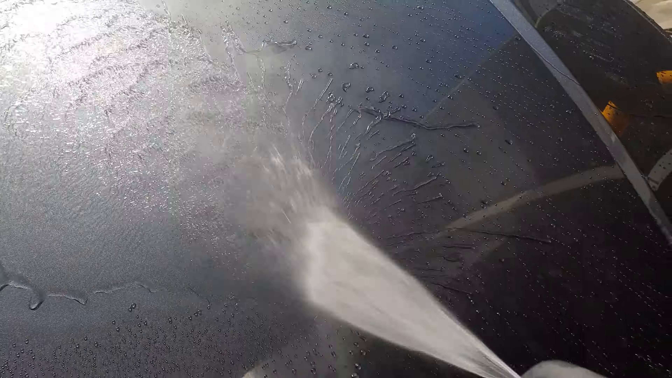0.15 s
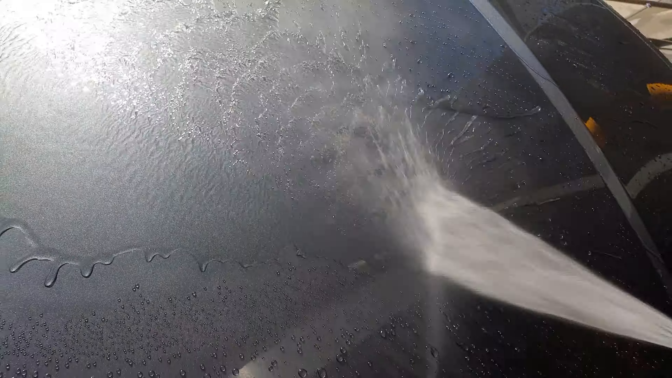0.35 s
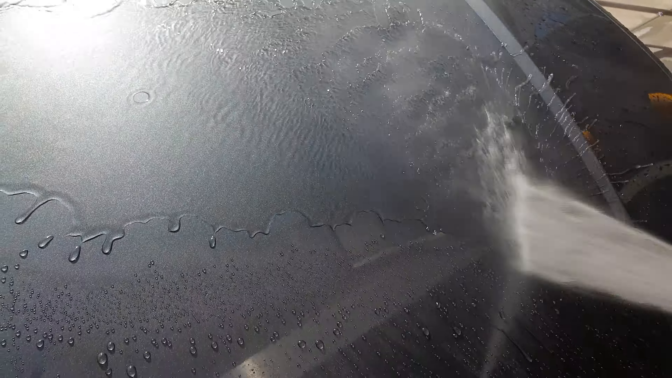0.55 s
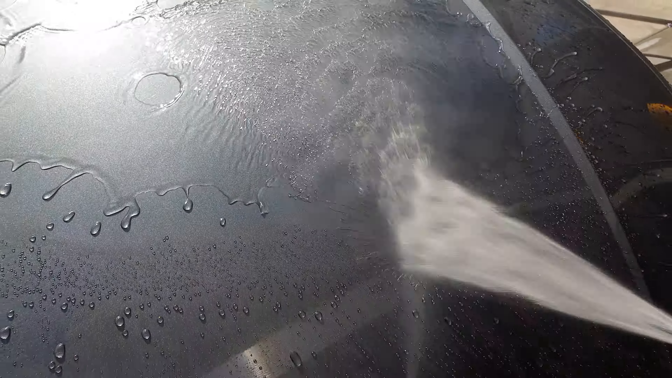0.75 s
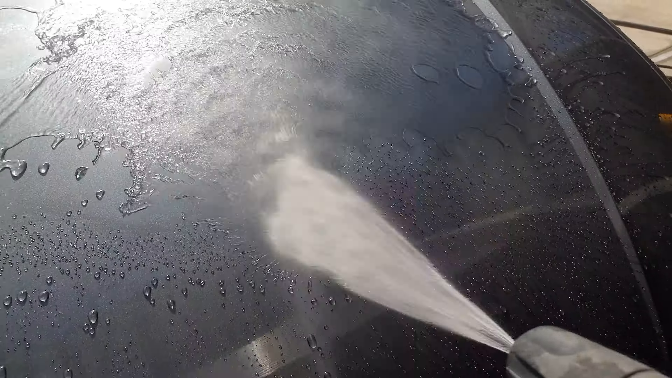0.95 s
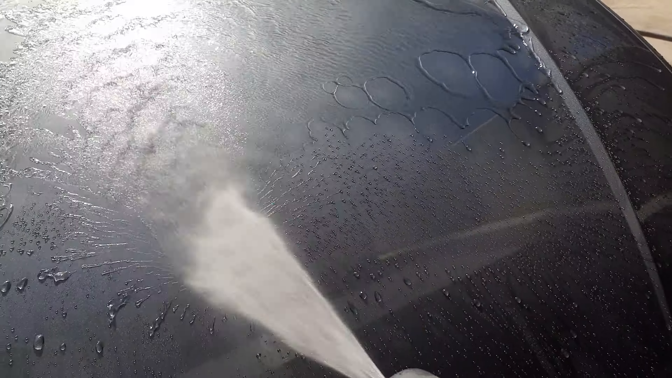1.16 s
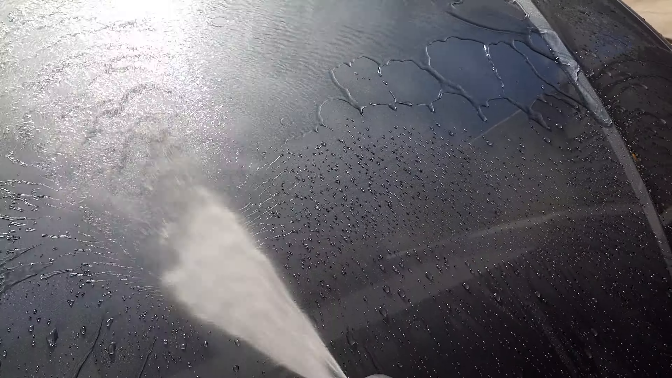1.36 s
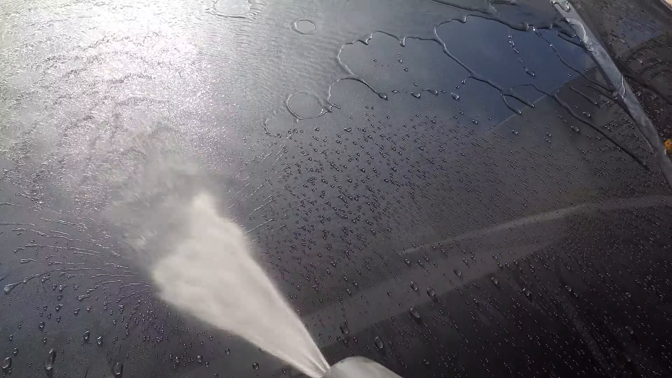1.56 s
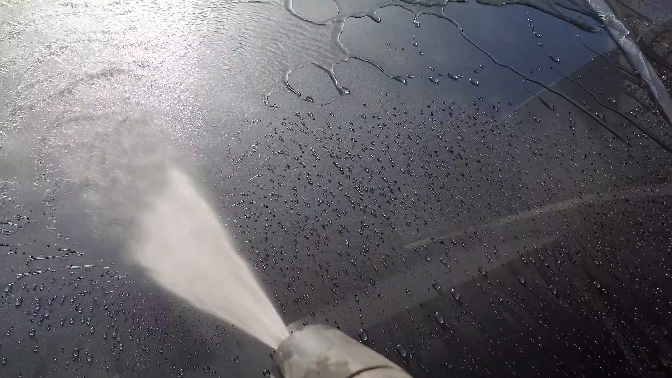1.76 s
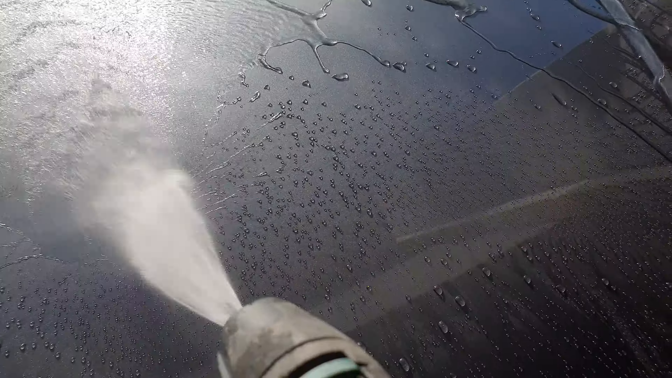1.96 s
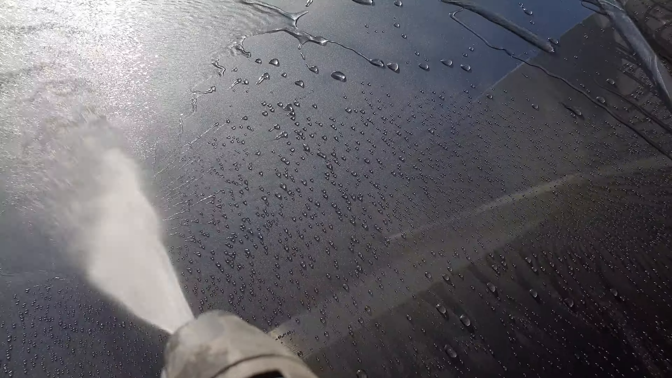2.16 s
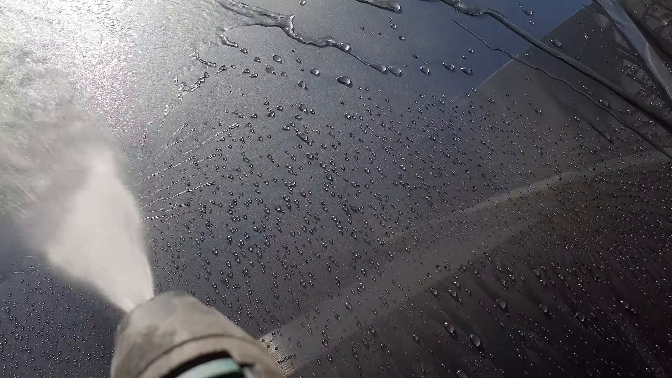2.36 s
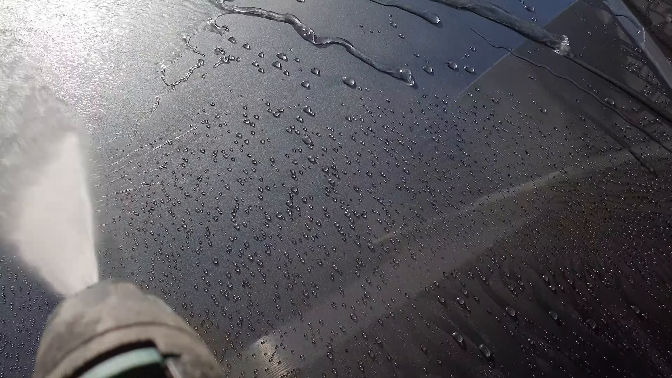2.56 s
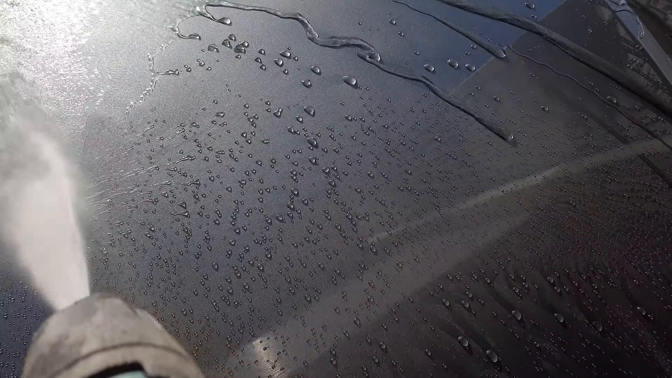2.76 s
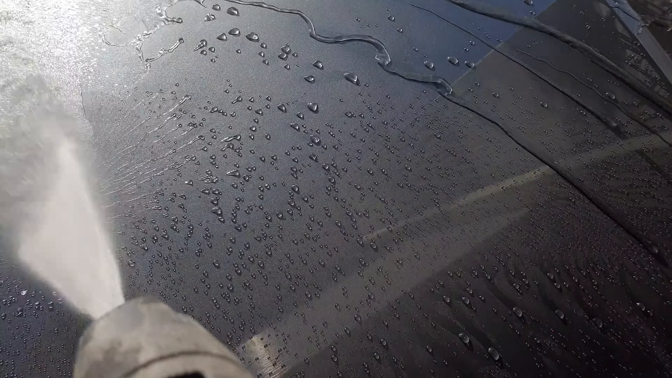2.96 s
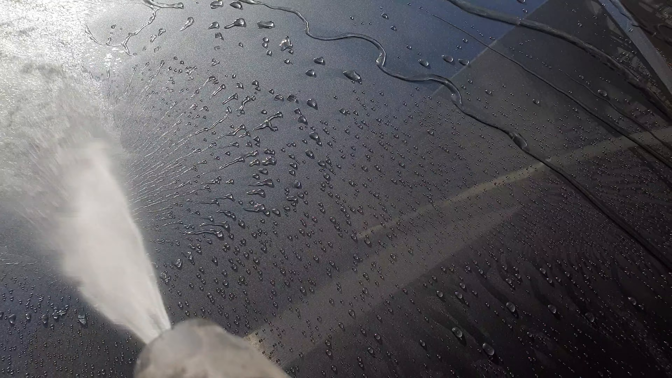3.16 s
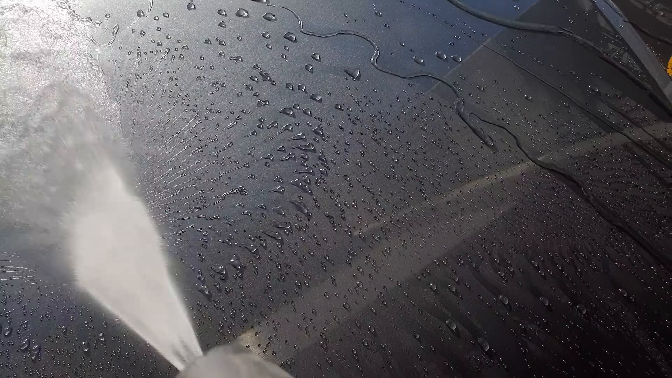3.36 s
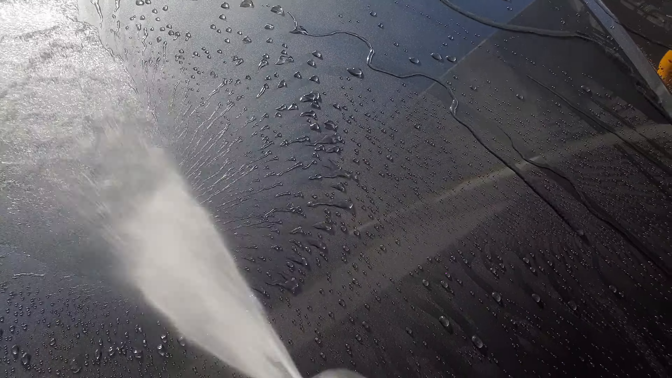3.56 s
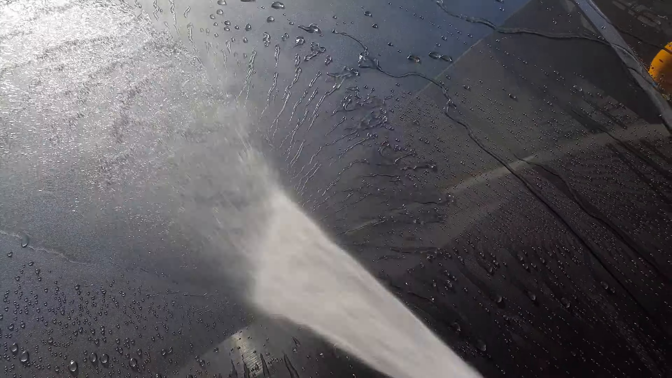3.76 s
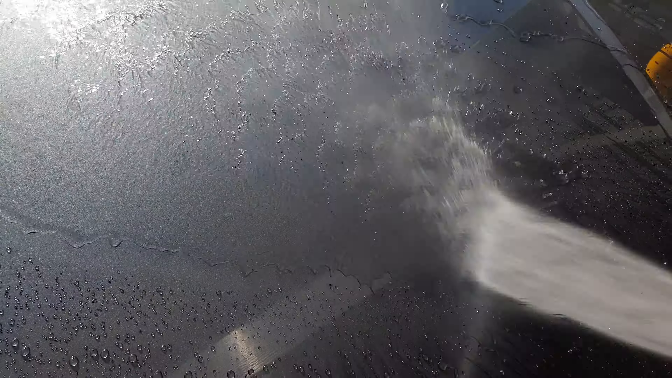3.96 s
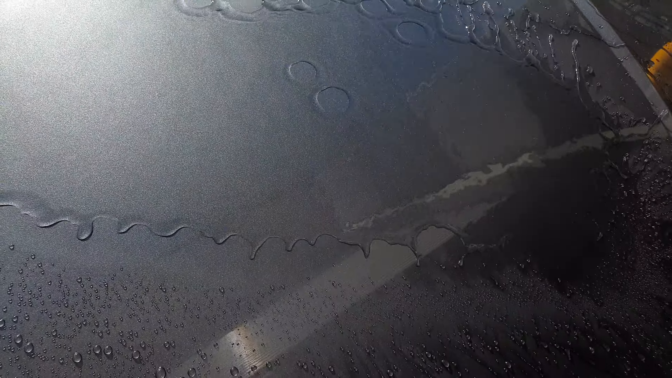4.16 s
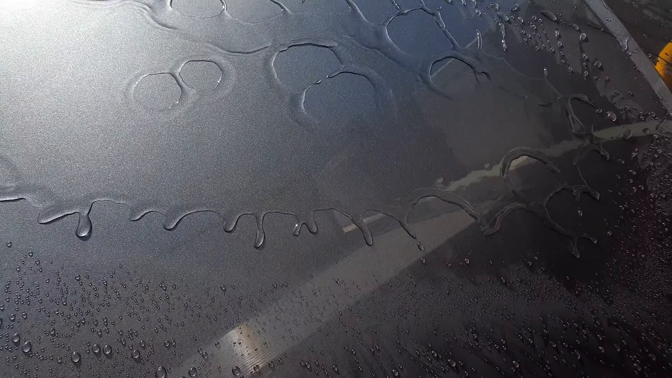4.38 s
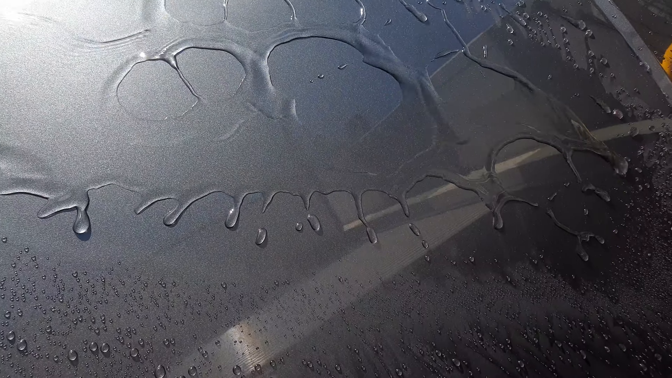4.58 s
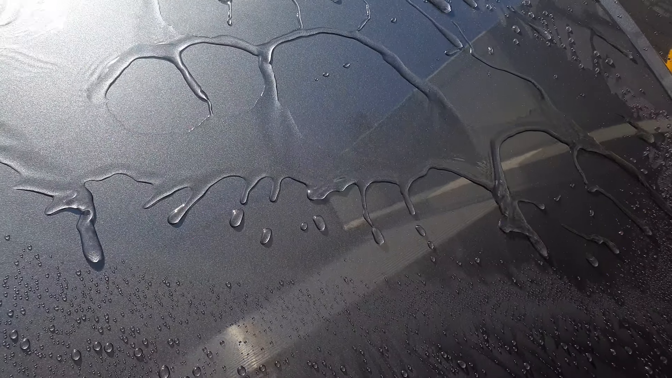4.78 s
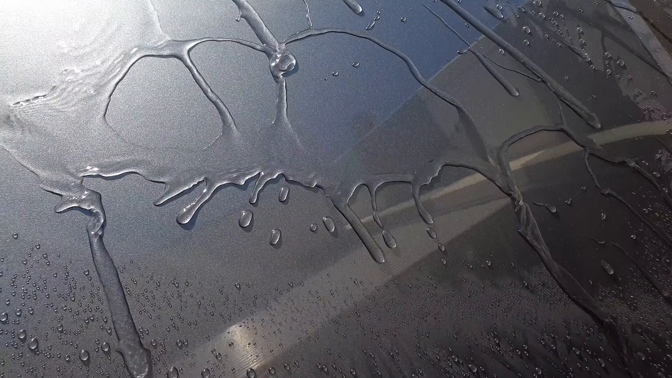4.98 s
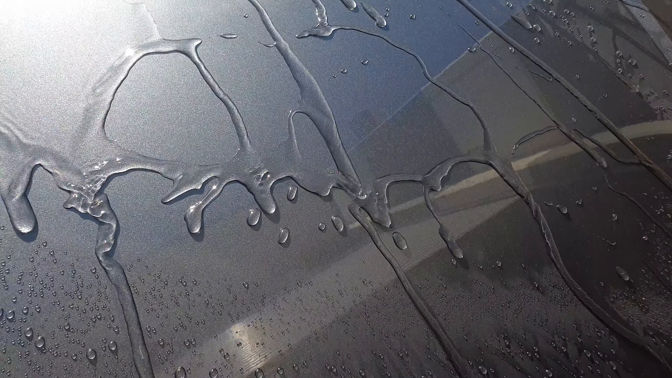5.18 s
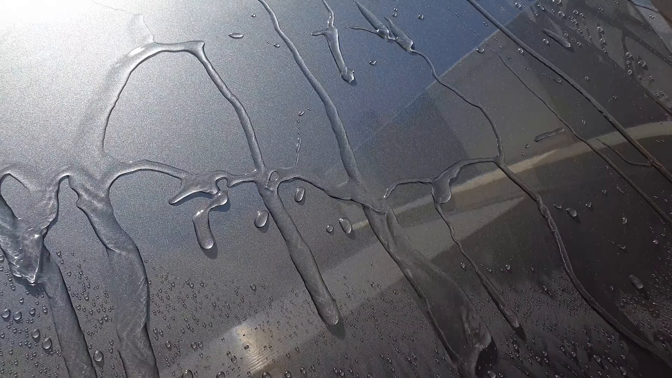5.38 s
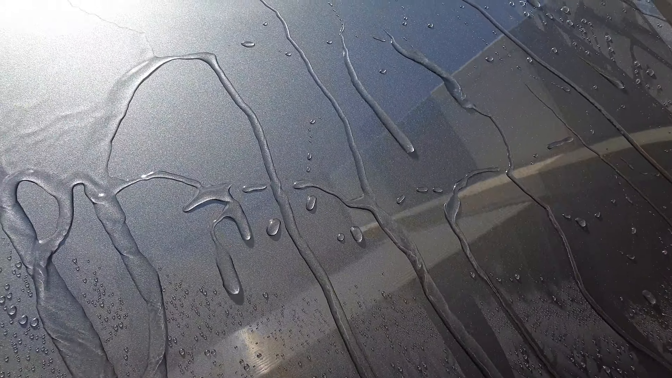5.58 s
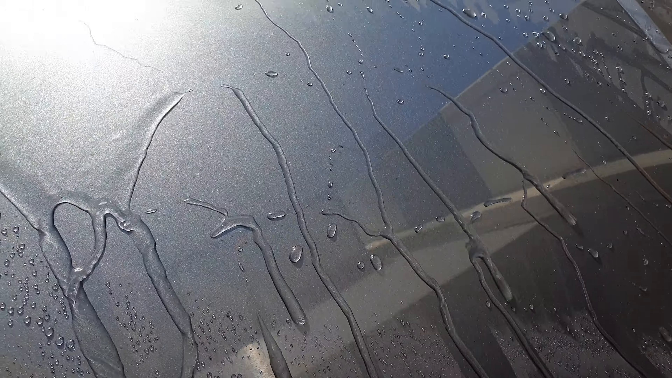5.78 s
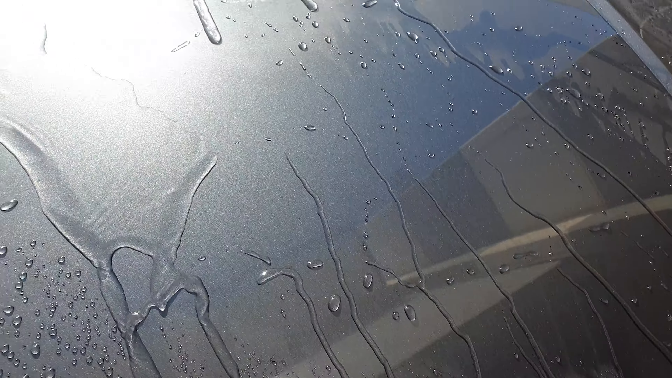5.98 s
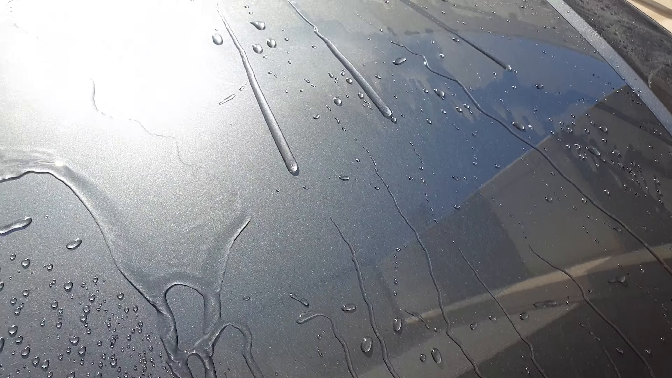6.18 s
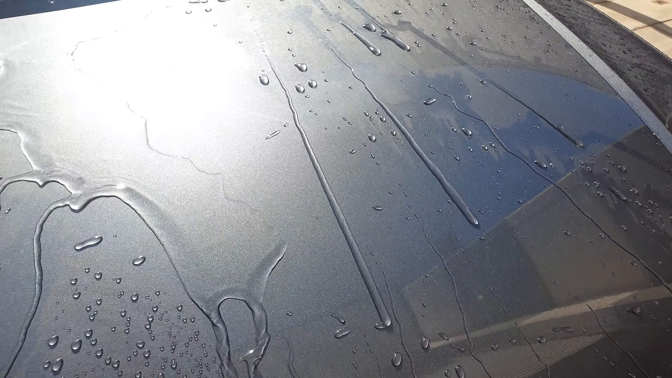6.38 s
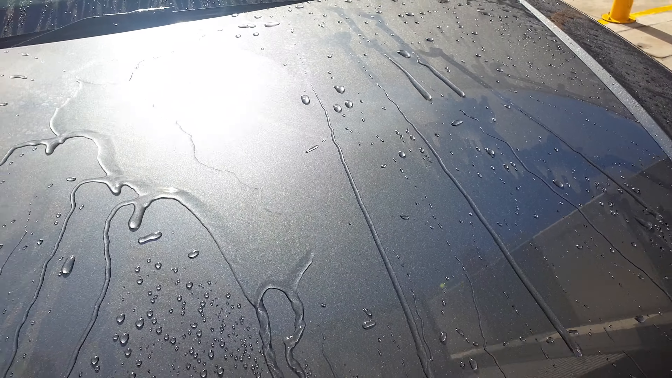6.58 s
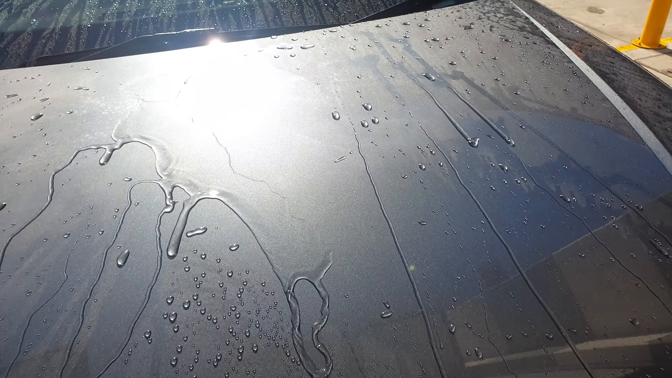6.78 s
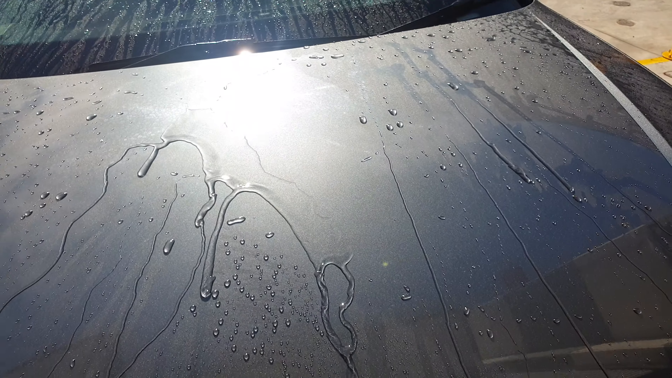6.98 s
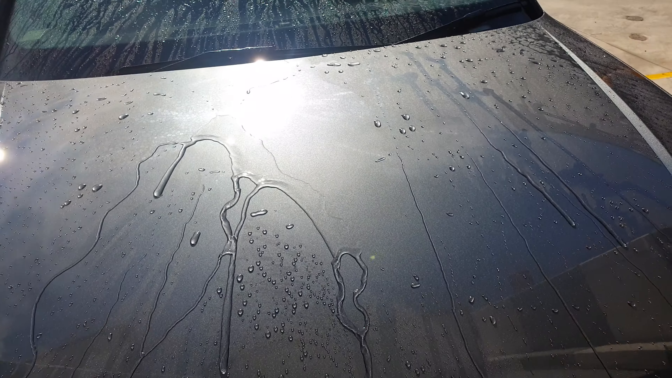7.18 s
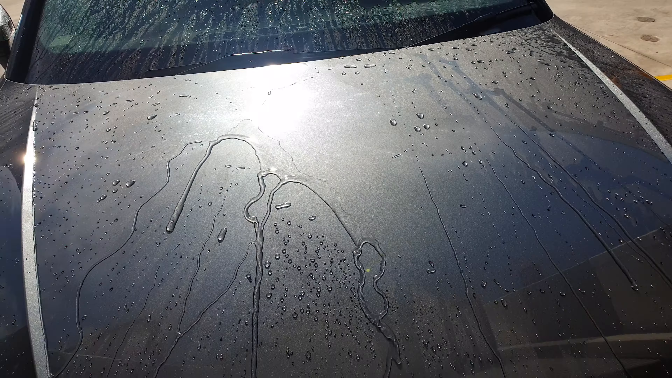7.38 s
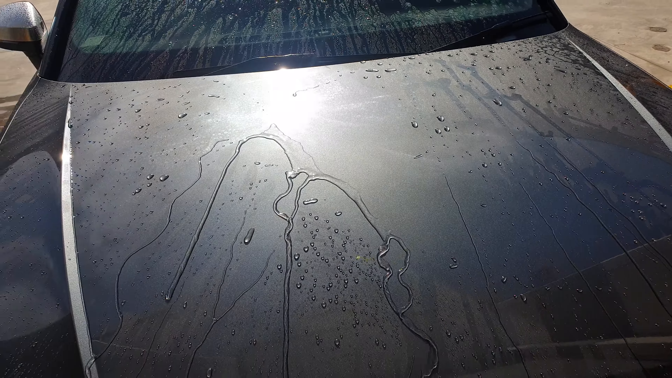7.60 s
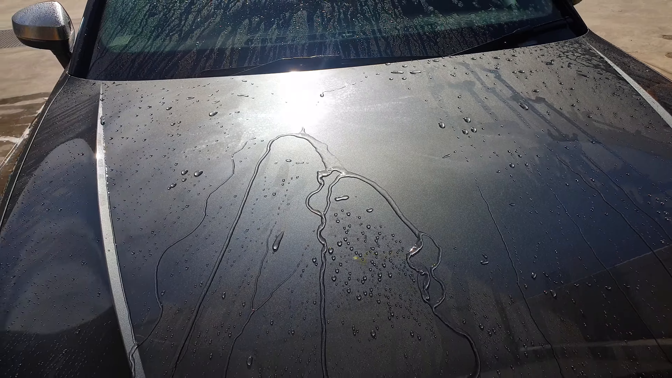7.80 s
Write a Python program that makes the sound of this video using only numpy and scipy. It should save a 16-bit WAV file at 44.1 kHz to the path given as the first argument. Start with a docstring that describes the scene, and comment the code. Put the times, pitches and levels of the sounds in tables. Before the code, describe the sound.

A loud, bright hiss of pressurised water hammers a car's panel near a stereo microphone, fluttering and changing colour with angle and distance. The trigger is released, the spray dies instantly with a slight outdoor echo, and the motor slides down in pitch, squealing briefly. Then near-quiet: sparse water drops, crackly clothing movement, tiny clicks and scuffs, and low far-off traffic and engine hum.

```python
"""A pressure washer's fan jet sweeps over a car bonnet in an open yard, near two microphones: banded noise
whose level, lag and bounces move. The trigger is released: the jet cuts off and the motor whines down
as falling partials with fan rush and two squeals. Drips (rising sines), cloth rustle, scuffs and ticks
(filtered grains), a distant traffic wash (noise) and an engine (low partials) remain."""
import sys
import numpy as np
from scipy import signal
from scipy.fft import rfft, irfft
from scipy.io import wavfile
from scipy.ndimage import uniform_filter1d, map_coordinates

SR = 44100
rng = np.random.default_rng(int(sys.argv[2]) if len(sys.argv) > 2 else 0)


def generate_wav(signal):
    """Clip the signal to [-1, 1] and save it as 16-bit WAV at the path in sys.argv[1]."""
    frames = np.transpose(np.atleast_2d(signal))
    scaled = np.clip(frames, -1, 1) * 32767
    pcm = np.round(scaled).astype(np.int16)
    wavfile.write(sys.argv[1], SR, pcm)


N = 345744
TIME_S = np.arange(N) / SR
GRAIN_S = np.arange(2048) / SR  # time within one small event
SHUT_S = 4.101  # valve shuts

# noise alike at both microphones: (frequency [Hz], share of power [0-1])
ALIKE_SHARE = [(60, .98), (300, .95), (600, .95), (1500, .82), (4000, .66), (8000, .55), (15000, .42)]


def undb(db):
    """Decibels to amplitude ratio."""
    return 10 ** (np.asarray(db) / 20)


def level(x, db):
    """Scale to an rms level."""
    return x * undb(db) / np.sqrt(np.mean(x ** 2))


def curves(table):
    """Columns of a table as per-sample curves; the first column is time."""
    s, *columns = np.transpose(table)
    return [np.interp(TIME_S, s, c) for c in columns]


def on_bins(points):
    """(Hz, value) points read at every frequency bin, on a log scale."""
    hz, value = np.transpose(points)
    return np.interp(np.log(np.arange(N // 2 + 1) * SR / N + 1), np.log(hz), value)


def filtered(x, gain):
    """Multiply the spectrum by a gain per bin."""
    return irfft(rfft(x) * gain, N)


def resonance(modes):
    """Summed gain of (Hz, width Hz, dB) peaks at every bin."""
    f = np.arange(N // 2 + 1) * SR / N
    return sum(undb(db) / (1 + (2 * (f - hz) / width) ** 2) for hz, width, db in modes)


def walk(rate):
    """Random levels held 1 / rate s and slewed twice; spread near 1."""
    k = max(int(SR / rate), 1)
    held = np.repeat(rng.standard_normal(N // k + 1), k)
    return 1.7 * uniform_filter1d(uniform_filter1d(held, k), k)[:N]


def late(x, ms):
    """Read a sound a moving time later."""
    return map_coordinates(x, [np.arange(N) - ms * SR / 1000 * np.ones(N)], order=3, mode="nearest")


def place(x, lag_ms, pan_db):
    """One source at two microphones: left lags by lag_ms and is pan_db louder."""
    return np.array([late(x, lag_ms) * undb(pan_db / 2), x * undb(-pan_db / 2)])


def wide_noise(like, lag_ms, grain_db, grain_rate, focus=0.78):
    """Grainy noise from one direction, mixed with scattered noise that differs at each microphone."""
    share = np.clip(on_bins(like), 0, 1)
    direct = focus * level(undb(grain_db * walk(grain_rate)) * rng.standard_normal(N), 0)
    scattered = level(undb(grain_db * walk(grain_rate)) * rng.standard_normal((2, N)), 0) / focus
    both = filtered(place(direct, lag_ms, 0.), np.sqrt(share)) + filtered(scattered, np.sqrt(1 - share))
    return both / np.sqrt((focus ** 2 + focus ** -2.) / 2)


def partials(hz, orders, waver, jitter):
    """Multiples of a moving, jittering pitch, each wavering in level [dB]."""
    phase = 2 * np.pi * np.cumsum(hz * (1 + jitter * walk(160))) / SR
    return sum(np.sqrt(2) * undb(db + waver * walk(140)) * np.sin(k * phase) for k, db in orders)


def add(out, sound, s, db, pan_db):
    """Mix one small event in at a peak level; the left microphone is a little further."""
    i, sound = int(s * SR), sound / np.abs(sound).max()
    out[0, i + 1:i + 1 + len(sound)] += sound * undb(db + pan_db / 2)
    out[1, i:i + len(sound)] += sound * undb(db - pan_db / 2)


def echoed(x, t60, db):
    """Scattered returns from the yard's walls, different at each microphone."""
    tail = rng.standard_normal((2, SR)) * 1000. ** (-np.arange(SR) / SR / t60)
    tail = tail * undb(db) / np.sqrt(np.sum(tail ** 2) / 2)
    return signal.fftconvolve(x[None], tail, axes=1)[:, :N]


def swell(peak, rise, hold, fall, db):
    """Gain that climbs 20 dB in rise s up to the peak, holds, then drops 20 dB in fall s."""
    t = TIME_S - peak
    return undb(db - 20 * np.maximum(np.maximum(-t / max(rise, .005), (t - hold) / max(fall, .005)), 0))


def glide(peak, rise, end, first_hz, top_hz, last_hz):
    """Pitch that slides during the rise, then drifts until end s after the peak."""
    return np.interp(TIME_S, [peak - rise, peak, peak + end], [first_hz, top_hz, last_hz])


def nozzle_spray(lag_ms, hiss_db, wall_db):
    """Splash on the panel, hiss from the nearer nozzle and a return from the left, each with its own lag."""
    # (frequency [Hz], share of power alike [0-1])
    jet_alike = [(60, 0.99), (300, 0.93), (600, 0.97), (1000, .97), (1500, 0.84), (4000, 0.7), (8000, 0.61),
                 (15000, 0.45)]
    # nozzle hiss band: (frequency [Hz], gain)
    nozzle_band = [(3500, 0), (7000, 1)]
    # band of the return from the left: (frequency [Hz], gain)
    wall_band = [(600, 0), (2500, .8), (5000, 1)]
    # housing's effect on the left side: (frequency [Hz], phase lead [rad])
    port_phase = [(200, .1), (600, 0.68), (1200, 1.74), (2500, 2.36), (7000, 3.96)]
    nozzle_lag_ms, nozzle_swing, wall_lag_ms = -.045, 2.05, -.52  # nearer, so it swings wider than the splash
    splash = wide_noise(jet_alike, lag_ms, grain_db=1.5, grain_rate=900, focus=0.8)
    bands = np.array([on_bins(nozzle_band), on_bins(wall_band)])
    hiss, wall = filtered(rng.standard_normal((2, N)), bands)
    mix = splash + place(hiss * undb(hiss_db), nozzle_lag_ms + nozzle_swing * lag_ms, 0.)
    mix = mix + place(wall * undb(wall_db), wall_lag_ms, 0.)
    left, right = mix / np.sqrt(1 + undb(2 * hiss_db) / 2 + undb(2 * wall_db))
    return np.array([filtered(left, np.exp(1j * on_bins(port_phase))), right])


def bounced(spray, lag_ms, bounce_ms, bounce):
    """Inverted, delayed copies off the bonnet comb the spray; a later return reaches the left side only."""
    # (frequency [Hz], share returned [0-1])
    bounce_band = [(1200, 0), (3000, .8), (4500, 1), (6000, 1), (7800, 0)]
    # left-only return: (time [s], delay [ms], gain)
    left_return = [(1.9, 1.0, 0), (2.15, .93, .22), (2.6, .92, .14), (3.3, .92, .15), (3.65, .96, .18),
                   (3.8, 1.0, 0)]
    near_ms, near_gain = .5, .4  # second, shorter path; gain re the first
    path_ms_per_lag_ms = -.4  # added on the left, taken off on the right
    returned = filtered(spray, on_bins(bounce_band))
    copies = []
    for x, side in zip(returned, (1, -1)):
        first = late(x, bounce_ms + side * path_ms_per_lag_ms * lag_ms)
        copies.append(first + near_gain * late(x, near_ms))
    return_ms, return_gain = curves(left_return)
    extra = np.array([return_gain * late(returned[0], return_ms), np.zeros(N)])
    return spray + bounce * np.array(copies) + extra


def angle_dip(x):
    """A dip in the hiss slides with the jet's angle, by crossfading two fixed notches."""
    # (time [s], share at the high place [0-1], depth [0-1])
    dip = [(0, 0.69, 0.47), (.35, .3, .4), (.6, 0.24, .6), (.9, 0.21, 0.33), (1.15, 0.79, .5),
           (1.5, 0.87, 0.5), (1.9, .9, 0.57), (2.2, 0.31, .3), (2.8, 0.93, .4), (3.4, 0.36, 0.22),
           (3.85, .7, 0.47), (4.1, 0.17, .5)]
    # low and high place: (centre [Hz], width [Hz], level [dB])
    dip_places = [(7400, 1300, 0), (8700, 1500, 0)]
    high, depth = np.clip(curves(dip), 0, 1)
    removed = sum(share * filtered(x, resonance([spot])) for share, spot in zip((1 - high, high), dip_places))
    return x - depth * removed


def jet():
    """Droplets hammer the panel: six bands of one hiss follow angle and distance, each fluttering; a valve cuts it."""
    # sweep: (time [s], splash [dB], slap [dB], fizz [dB], left's lag on right [ms])
    jet_sweep = [(0, -19, -23.5, -28.5, 0.046), (.2, -16, -21, -28.5, 0.12), (.33, -21, -23, -35.5, 0.13),
                 (.52, -19, -24.5, -31, 0.23), (.62, -20, -25, -28.5, 0.22), (.7, -18.5, -24, -28.5, 0.23),
                 (.83, -22.5, -26.5, -32, .15), (1.06, -19, -22.5, -29.5, 0.13),
                 (1.22, -20.5, -25.5, -32, 0.052), (1.55, -20.5, -25.5, -32, 0.052),
                 (1.85, -22.5, -24.5, -30, -0.024), (2.05, -22, -26, -30, -0.027),
                 (2.5, -22, -24.5, -31, -0.072), (3.3, -21, -24, -30, -0.053),
                 (3.68, -21, -23.5, -27.5, -0.025), (3.8, -18.5, -22, -34.5, 0.046),
                 (3.97, -17, -22, -27, 0.16), (4.03, -16.5, -25.5, -27.5, 0.18),
                 (4.1, -21, -23.5, -27, 0.3)]
    # bonnet under the spray: (time [s], bounce delay [ms], bounce gain, boom [dB])
    bonnet = [(0, .68, -.2, -48), (.35, .82, -.12, -49), (.8, 1.0, -.12, -44), (1.0, 1.14, -.24, -43.5),
              (1.3, 1.12, -.36, -43), (1.75, .98, -.2, -42.5), (1.95, .88, -.1, -42),
              (2.2, .76, -.16, -43.5), (2.5, .74, -.14, -44.5), (2.9, .72, -.1, -44.5),
              (3.35, .72, -.16, -43), (3.7, .84, -.2, -43), (4.1, 1.0, -.16, -48)]
    # nozzle: (time [s], mist [dB], hiss re splash [dB], return from the left re splash [dB])
    nozzle = [(0, -22.5, -5.5, -13.5), (.3, -21.5, -4, -17), (.52, -17.5, -3.5, -18), (.73, -18, -4.5, -14),
              (.85, -23, -5, -12), (1.1, -22, -5, -8.5), (1.2, -27, -3.5, -4), (1.35, -24, -5.5, -8),
              (1.6, -22.5, -7, -5), (2.0, -23.5, -4, -8.5), (2.4, -25, 0, -8.5), (2.75, -23.5, 0.5, -7.5),
              (3.35, -23, -2, -7.5), (3.6, -23, -5, -8), (3.8, -22, -3.5, -5), (4.0, -18, -4, -13.5),
              (4.1, -18, -4, -16.5)]
    # relative spectrum, each band levelled afterwards: (frequency [Hz], density [dB per Hz])
    jet_colour = [(24, -64.5), (40, -34.5), (171, -21.5), (344, -18.5), (463, -13.5), (520, -12.5),
                  (627, -10.5), (820, -2.5), (1000, -4), (1330, -3.5), (2120, 2), (2740, 0), (3900, 4),
                  (4640, 4.5), (5500, 3.5), (6580, -0.5), (7200, -5), (7840, -7), (9200, -6), (11500, -7),
                  (12400, -11.5), (13000, -14), (14700, -14.5), (15800, -17.5)]
    # boom | drumming | slap | splash | fizz | mist: (edge [Hz])
    jet_edges_hz = [500, 1300, 3000, 6800, 9300]
    shut_t60_s, echo_t60_s, echo_db = .035, 0.59, -24
    splash_db, slap_db, fizz_db, lag_ms = curves(jet_sweep)
    bounce_ms, bounce, boom_db = curves(bonnet)
    mist_db, hiss_db, wall_db = curves(nozzle)
    # moving right, the drumming grows and the left side loses its lead
    drum_db = -31 + 5.5 * lag_ms
    pan_db = 3 - 14.5 * np.maximum(lag_ms - 0.086, 0)
    spray = bounced(nozzle_spray(lag_ms, hiss_db, wall_db), lag_ms, bounce_ms, bounce)
    lows = [0] + [on_bins([(hz / 1.195, 1), (hz * 1.553, 0)]) for hz in jet_edges_hz] + [1]
    band_dbs = (boom_db, drum_db, slap_db, splash_db, fizz_db, mist_db)
    shades = (.35, 1.2, 1.4, 1.4, 0.7, 1.1)  # the housing shades the bass less than the hiss
    surge, out = walk(8.6), 0
    for low, high, db, shade in zip(lows, lows[1:], band_dbs, shades):
        part = level(filtered(spray, undb(on_bins(jet_colour)) * (high - low)), 0)
        flutter_db = 0.19 * surge + 0.61 * walk(25.03)
        out = out + part * undb(db + flutter_db + shade * np.array([pan_db, -pan_db]) / 2)
    out = angle_dip(out) * undb(-60 * np.maximum(TIME_S - SHUT_S, 0) / shut_t60_s)
    return out + echoed(out.mean(axis=0), echo_t60_s, echo_db)


def pump():
    """The pump throbs low while water flows: noise through a narrow 176 Hz resonance."""
    throb = level(filtered(rng.standard_normal(N), resonance([(176, 10, 0)])), -62)
    return throb * np.interp(TIME_S, [SHUT_S, 4.2], [1, 0])


def whine(hz, drive_db):
    """Multiples of the motor's falling pitch pass through the casing's resonances."""
    # (multiple, level [dB])
    whine_orders = [(1, 1.5), (2, 1), (3, -2), (4, -2), (5, -6), (6, -10), (7, -12), (8, -13), (10, -14)]
    # (frequency [Hz], gain [dB])
    casing = [(300, -22), (400, -5), (470, -19), (580, -15), (700, -4), (850, -1), (1150, 2), (1400, -4),
              (1650, -13), (1900, -4), (2050, 0), (2250, -7), (2500, -1), (2800, -1), (2950, -14),
              (3350, -8), (3700, -12), (4050, -1), (4500, -7), (5200, 0), (5900, -2), (6700, -9),
              (7300, -20), (8200, -11), (9000, -20), (9800, -14), (12000, -30)]
    tones = partials(hz, whine_orders, waver=3.0, jitter=.016) * undb(drive_db)
    return filtered(tones, undb(on_bins(casing)))


def fan_rush(hz, lag_ms):
    """Fan noise falls 6 dB per octave of whine pitch, then dies; it is lower while the pump works."""
    # relative spectrum: (frequency [Hz], density [dB per Hz])
    rush_colour = [(35, -47.5), (60, -30), (140, -34), (261, -29), (400, -21), (620, -18.5), (760, -7),
                   (950, -8.5), (1200, -9), (1530, -15.5), (2030, -13), (2810, -15), (3240, -14.5),
                   (4900, -15), (5600, -11.5), (6400, -15.5), (7400, -28), (8200, -23), (8900, -27),
                   (9800, -24.5), (11000, -26.5), (12500, -29), (15800, -35.5)]
    rush_db_at_1khz, db_per_octave, loaded_db = -42.5, 6, -4.5
    fan_stops_s, fade_db_per_s = 4.836, 101
    rush = wide_noise(ALIKE_SHARE, lag_ms, grain_db=1.0, grain_rate=150)
    rush = filtered(rush, undb(on_bins(rush_colour)))
    rush_db = rush_db_at_1khz + db_per_octave * np.log2(np.maximum(hz, 350) / 1000)
    rush_db = rush_db - fade_db_per_s * np.maximum(TIME_S - fan_stops_s, 0)
    rush_db = rush_db + np.interp(TIME_S, [SHUT_S - .05, SHUT_S], [loaded_db, 0])
    return level(rush, 0) * undb(rush_db + 0.85 * walk(30))


def squeals():
    """A low and a high squeal as the parts slow: gliding partials that swell and fade."""
    # low, high: (peak [s], rise [s], hold [s], fall [s], level [dB], first [Hz], top [Hz], last [Hz])
    squeal_swells = [(4.34, .14, .17, .08, -45, 790, 890, 903),
                     (4.52, .03, .24, .11, -46, 1390, 1420, 1388)]
    # (multiple, level [dB])
    low_orders = [(1, -2), (2, 1), (2.5, -11), (3, -8)]
    # (multiple, level [dB])
    high_orders = [(1, -9), (2, 0), (3, -12), (4, -10), (6, -22), (7, -20)]
    voices = []
    for (s, rise, hold, fall, db, *ends), orders in zip(squeal_swells, (low_orders, high_orders)):
        tone = partials(glide(s, rise, hold + fall, *ends), orders, waver=3.5, jitter=.011)
        voices.append(tone * swell(s, rise, hold, fall, db))
    return voices


def motor():
    """Whine, squeals and fan rush reach the microphones past the housing; walls smear the tones."""
    # (time [s], whine pitch [Hz], drive before the casing [dB])
    run_down = [(4.05, 3600, -46), (4.14, 3000, -43), (4.19, 2650, -42), (4.26, 2065, -43),
                (4.33, 1750, -44), (4.42, 1420, -44), (4.51, 1150, -44), (4.62, 830, -46), (4.7, 600, -48),
                (4.77, 420, -50), (4.81, 340, -66), (4.9, 199, -100)]
    # housing between motor and left microphone: (frequency [Hz], phase lead [rad], left minus right [dB])
    motor_shade = np.array([(200, .1, -1), (400, .4, -1), (900, .9, 2.5), (1400, .55, 4), (1800, .8, 5),
                            (2100, -.1, 6), (2700, -.7, 3.5), (3500, -.3, 1), (5300, .6, 0)])
    lag_ms = .41
    hz, drive_db = curves(run_down)
    whining = whine(hz, drive_db)
    low, high = squeals()
    tones = whining + low + high
    echo = echoed(tones, t60=0.2, db=-5)
    ring = echoed(filtered(high, resonance([(2820, 300, 0)])), t60=1.4, db=-16)  # high squeal hangs on in the yard
    left, right = place(tones, lag_ms, 0.) + fan_rush(hz, lag_ms)
    ahead_rad, pan_db = on_bins(motor_shade[:, [0, 1]]), on_bins(motor_shade[:, [0, 2]])
    left = filtered(left, np.exp(1j * ahead_rad) * undb(pan_db / 2))
    return np.array([left, filtered(right, undb(-pan_db / 2))]) + echo + ring


def traffic():
    """Smooth distant wash of coloured noise: low under the jet, up 7 dB within a second after it, then near steady."""
    # relative spectrum: (frequency [Hz], density [dB per Hz])
    yard_colour = [(15, -41), (25, -14.5), (82, -3), (102, -5.5), (141, -12.5), (228, -23.5), (587, -26),
                   (769, -12), (905, -11), (2810, -29.5), (4100, -28.5), (5670, -27.5), (8270, -41.5),
                   (11100, -35.5), (15800, -37)]
    # (frequency [Hz], share of power alike [0-1])
    yard_alike = [(25, .995), (250, .93), (600, .8), (1200, .65), (2200, .3), (4000, .35), (8000, .05)]
    # (time [s], gain [dB])
    wash_gain = [(4.3, -8.5), (5.0, -1.5), (6.2, 0.5), (6.9, -2.5)]
    wash_db, lag_ms, pan_db = -62.5, -0.5, 2.5  # level before wash_gain
    wash = wide_noise(yard_alike, lag_ms, grain_db=.5, grain_rate=20)
    wash = filtered(wash, undb(on_bins(yard_colour)))
    pan = undb(np.array([[pan_db], [-pan_db]]) / 2)
    return pan * level(wash, wash_db) * undb(curves(wash_gain)[0])


def engine():
    """A distant engine drones in separate swells: a gliding fundamental and a weak third multiple."""
    # (peak [s], hold [s], level [dB], first pitch [Hz], last pitch [Hz])
    engine_swells = [(4.68, .33, -67, 72, 91), (5.1, .3, -62.5, 91.5, 89), (5.6, .42, -63.5, 86.5, 93),
                     (6.2, .46, -62.5, 69.8, 68.8), (6.78, .26, -63.5, 93, 76), (7.22, .14, -69, 93, 90),
                     (7.44, .2, -67, 75, 81), (7.7, .1, -61.5, 84, 88)]
    pitch = []
    for s, hold, db, first_hz, last_hz in engine_swells:
        pitch += [(s, first_hz), (s + hold, last_hz)]
    hz, = curves(pitch)
    gain = sum(swell(s, .08, hold, .08, db) for s, hold, db, *_ in engine_swells)
    return partials(hz, [(1, 0), (3, -28)], waver=.7, jitter=.004) * gain


def rustle():
    """Cloth fibres crackle: dense tiny grains in a dull and a bright band, the bright one with single snaps."""
    # one row a movement: (peak [s], rise [s], hold [s], fall [s], level [dB], treble re level [dB])
    movements = [(4.904, .1, 0.01, .4, -83, -18), (5.369, 0.069, .02, 0.26, -68.5, 1.5),
                 (5.618, 0.052, 0.023, 0.36, -67.5, -5), (5.858, 0.16, .04, 0.17, -75.5, 3),
                 (6.055, 0.26, 0.072, 0.2, -64.5, 6), (6.46, 0.17, 0.25, 0.12, -65, -1),
                 (6.937, 0.12, .02, 0.14, -74.5, 0), (7.199, 0.33, .03, 0.55, -67, -2.5),
                 (7.54, .15, .02, 0.44, -66, -3)]
    floor_db = -85
    snaps_per_s, snap_db, snap_spread_db = 90, 11, 2.5  # least snap re the raw bright noise, mean excess
    apart = [(1000, .2), (15000, .1)]
    dull = wide_noise(apart, 0.082, grain_db=2.5, grain_rate=830)
    dull = filtered(dull, resonance([(4700, 2400, 0.88), (6130, 1000, -2.0)]))
    chance = rng.random((2, N))
    snaps = (chance[0] < snaps_per_s / SR) * undb(snap_db - snap_spread_db * np.log(1 - chance[1]))
    bright = wide_noise(apart, .05, grain_db=3.0, grain_rate=400) + snaps
    bright = filtered(bright, resonance([(10500, 3900, 1.0), (13500, 3300, -5)]))
    moves = undb(floor_db) + sum(swell(*row[:5]) for row in movements)
    sheen = sum(swell(*row[:5]) * undb(row[5]) for row in movements)
    dull = level(dull, 0) * moves * undb(np.array([[2.2], [-2.2]]))
    return undb(0.99 * walk(10.0)) * (dull + level(bright, 0) * sheen)


def rasp():
    """A faint rasp swells near the end: grainy noise in two narrow bands."""
    # (peak [s], rise [s], hold [s], fall [s], low band [dB], high band [dB])
    rasp_swells = [(7.17, 0.5, 0.32, 0.24, -70.5, -74), (7.503, 0.025, 0.038, 0.49, -66, -66),
                   (7.598, 0.12, 0.077, 0.42, -81, -74)]
    # low, high: (centre [Hz], width [Hz])
    rasp_bands = [(2200, 640), (3600, 530)]
    scrape, out = wide_noise(ALIKE_SHARE, 0.059, grain_db=1.5, grain_rate=310), 0
    for k, (hz, width) in enumerate(rasp_bands):
        gain = sum(swell(*row[:4], row[4 + k]) for row in rasp_swells)
        band = level(filtered(scrape, resonance([(hz, width, 0)])), 0)
        out = out + band * gain * undb(np.array([[2.4], [-2.4]]))
    return out


def drips():
    """A drop landing in a puddle traps a bubble: a gritty, decaying sine whose pitch rises."""
    # (time [s], peak [dB], nominal pitch [Hz], left minus right [dB])
    drops = [(4.994, -48, 882, 1.5), (5.036, -56, 910, 2.5), (5.246, -51, 3920, 6), (5.382, -35.5, 4100, 8),
             (5.393, -52, 4520, -2), (5.628, -44, 4380, 6), (6.627, -46.5, 1347, 6)]
    out, t, t60_s = np.zeros((2, N + 8192)), GRAIN_S, 0.014
    for (s, db, hz, pan_db), grit in zip(drops, rng.standard_normal((len(drops), 2048))):
        bubble = np.sin(2 * np.pi * hz * (.9 * t + .5 * t ** 2 / t60_s))  # starts at 0.9 of nominal
        bubble = bubble * (1 + 1.1 * uniform_filter1d(grit, size=4))
        envelope = (1 - np.exp(-t / 0.00045)) * 1000. ** (-t / t60_s)
        band = signal.butter(2, [hz / 1.45, hz * 1.6], "band", fs=SR)
        add(out, signal.lfilter(*band, bubble * envelope), s, db, pan_db)
    return out[:, :N]


def scuffs():
    """Short gritty scuffs: runs of noise grains of random size in one band."""
    # (time [s], length [s], peak [dB], band centre [Hz], left minus right [dB])
    scuff_runs = [(5.366, .008, -53, 3500, 5), (5.632, .036, -50, 4500, 4), (5.761, .015, -55, 1500, 4),
                  (7.222, .03, -51, 4100, 5.5), (7.506, .032, -47, 4800, 3), (7.544, .028, -49, 6300, 3)]
    out = np.zeros((2, N + 8192))
    draws = rng.standard_normal((len(scuff_runs), 2, 2048))
    for (s, length, db, hz, pan_db), (grit, size) in zip(scuff_runs, draws):
        band = signal.butter(2, [hz / 1.25, hz * 1.3], "band", fs=SR)
        grains = grit * undb(5 * np.repeat(size[:32], 64))
        grains = grains * np.maximum(1 - (GRAIN_S / length) ** 2, 0)
        add(out, signal.lfilter(*band, grains), s, db, pan_db)
    return out[:, :N]


def ticks():
    """A dry tick is one sharp knock with a gritty tail, in one band."""
    # (time [s], peak [dB], band centre [Hz], left minus right [dB])
    knocks = [(5.6514, -49, 4670, 2), (5.6775, -51, 3000, 3), (5.7583, -49, 1730, 4.5),
              (5.8092, -47, 5310, 1.5), (5.862, -51, 5300, 2), (5.8775, -45, 9800, -1.5),
              (5.9698, -41, 5500, 1.5), (6.0162, -39, 5790, 3), (6.0367, -41, 11200, .5),
              (6.0454, -44, 6120, 1.5), (6.083, -44, 11000, 1), (6.0964, -45, 11800, 0),
              (6.1124, -48, 6680, 2), (6.1244, -47, 6850, 2.5), (6.1384, -44, 9730, 1.5),
              (6.3919, -50, 6710, 3.5), (6.4413, -48, 7500, 2), (6.4555, -54, 1100, 2),
              (6.4632, -43, 11300, 3), (6.5321, -35, 11300, 1.5), (6.5859, -45, 11900, 3),
              (6.6445, -50, 5500, 3), (6.6575, -46, 12500, 2.5), (6.684, -48, 10500, 2),
              (6.7181, -46, 4950, 4.5), (7.1462, -50, 6000, 3.5), (7.2025, -40, 5590, 4),
              (7.2434, -50, 4300, 4.5), (7.2814, -52, 3420, 3.5), (7.3592, -52, 6300, 4),
              (7.4465, -43, 2400, 4.5), (7.486, -52, 3000, 4), (7.5043, -35, 2500, 4),
              (7.5174, -46, 3550, 2), (7.5434, -46, 6300, 3), (7.5714, -48, 6000, 3)]
    out, t, t60_s = np.zeros((2, N + 8192)), GRAIN_S, 0.008
    for (s, db, hz, pan_db), grit in zip(knocks, rng.standard_normal((len(knocks), 2048))):
        band = signal.butter(2, [hz / 1.22, min(hz * 1.3, 14500)], "band", fs=SR)
        tail = .6 * grit * 1000. ** (-t / t60_s) * np.minimum(t / .001, 1)
        knock = 6.0 * (np.arange(2048) == 44) + tail  # impulse 1 ms in
        add(out, signal.lfilter(*band, knock), s, db, pan_db)
    return out[:, :N]


def scene():
    """All sources at the two microphones."""
    machine = jet() + pump() + motor()
    return machine + traffic() + engine() + rustle() + drips() + scuffs() + ticks() + rasp()


def record(dry):
    """The microphones' electronics round the loudest peaks and cut the top steeply."""
    rounded = 1.4 * np.tanh(dry / 1.4)
    top_hz = 15800
    return signal.sosfilt(signal.ellip(12, .2, 80, top_hz, fs=SR, output="sos"), rounded)


dry = scene()
out = record(dry)
generate_wav(out)
```